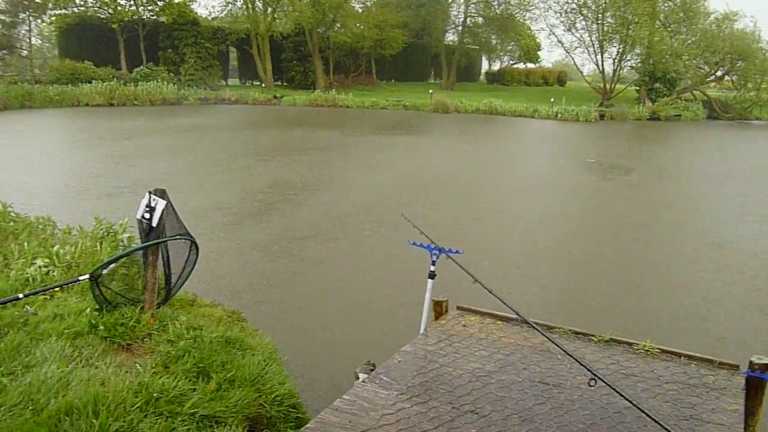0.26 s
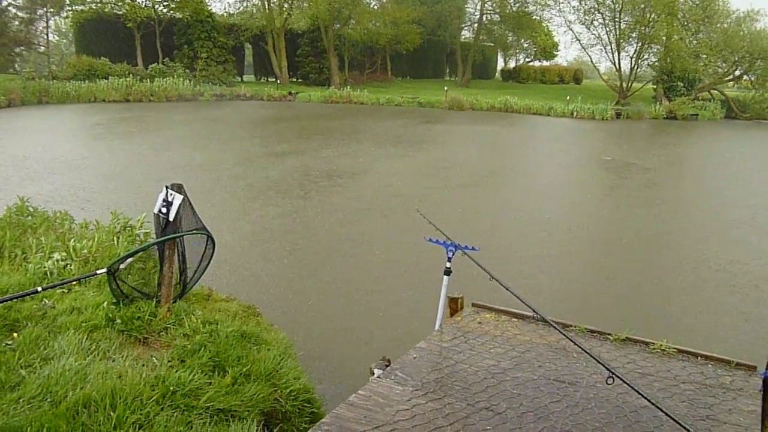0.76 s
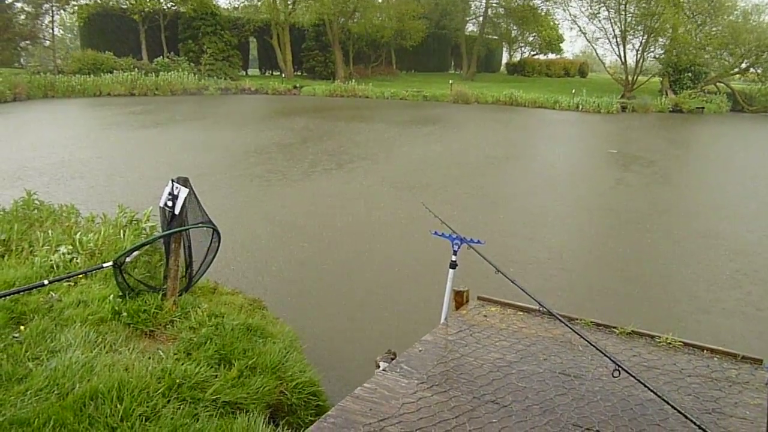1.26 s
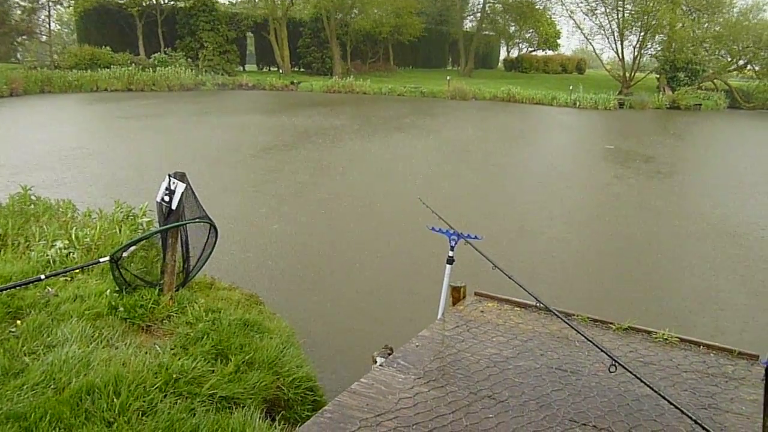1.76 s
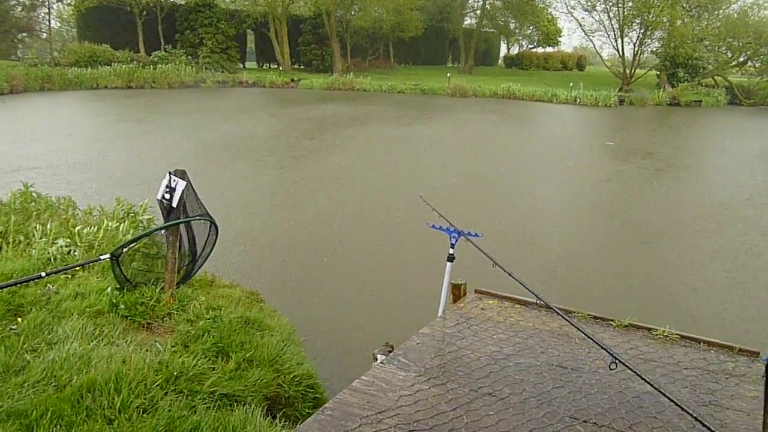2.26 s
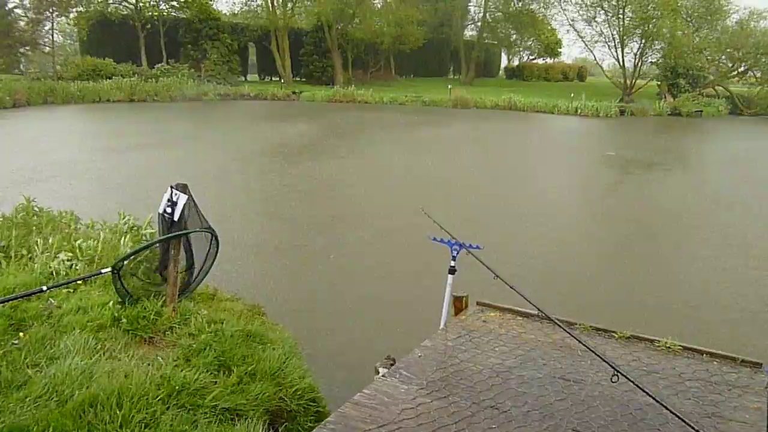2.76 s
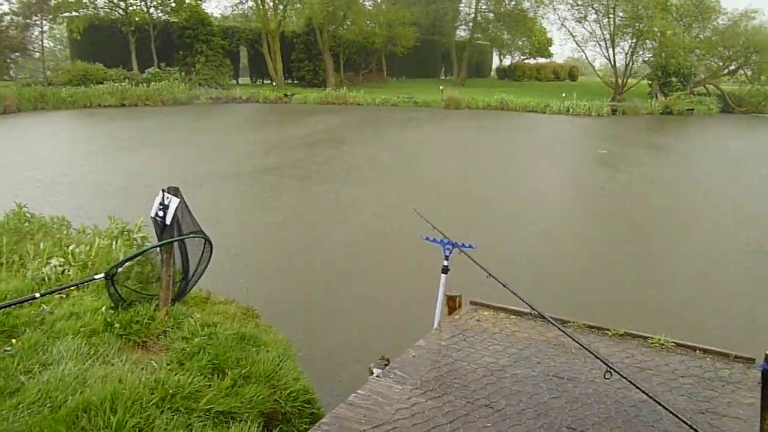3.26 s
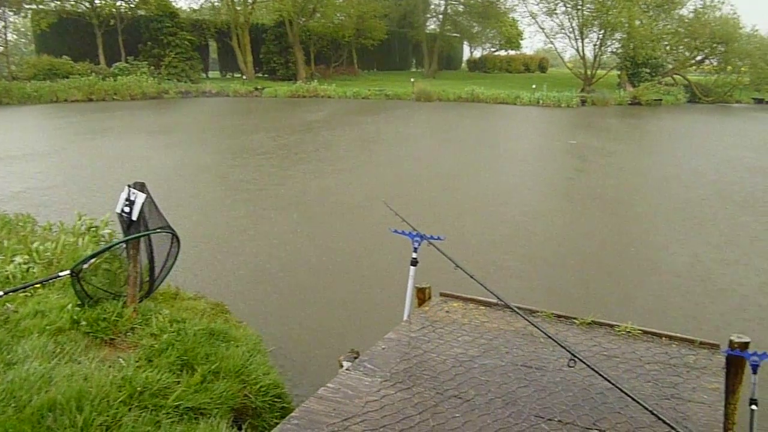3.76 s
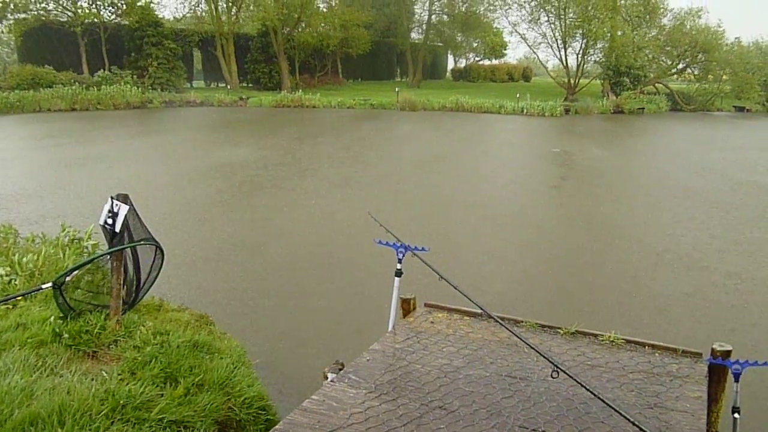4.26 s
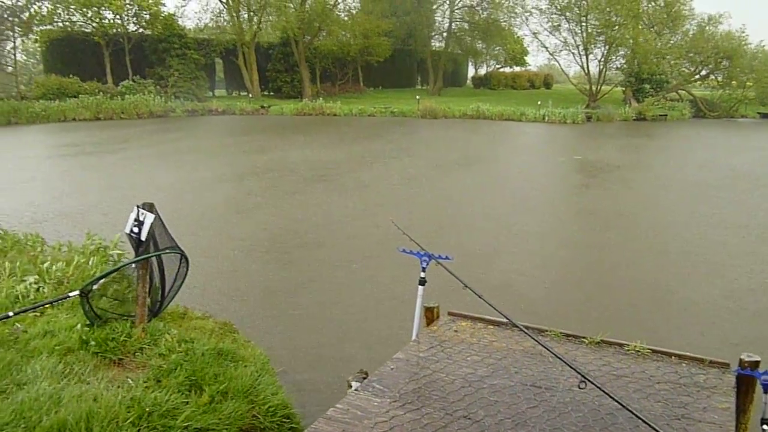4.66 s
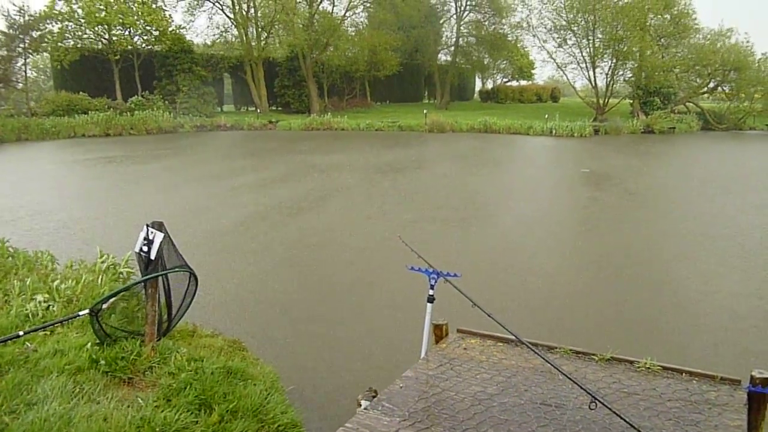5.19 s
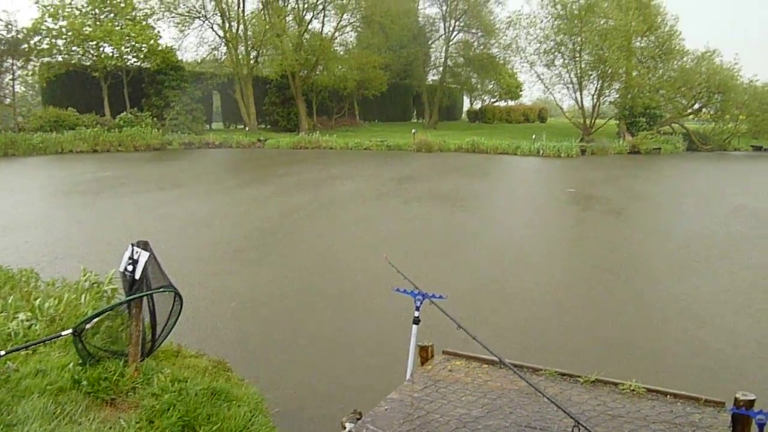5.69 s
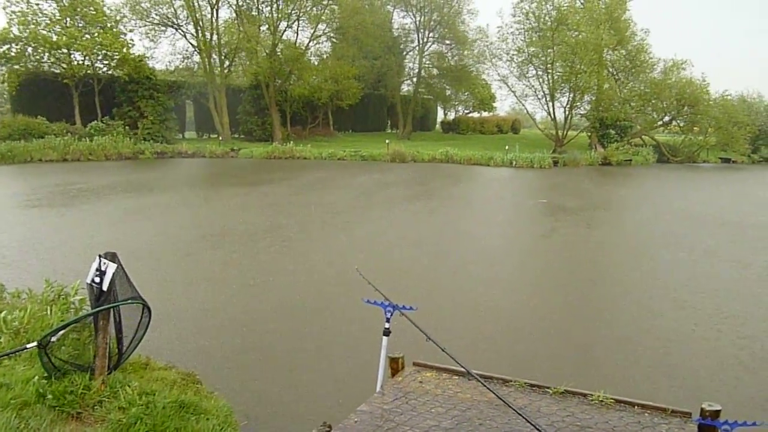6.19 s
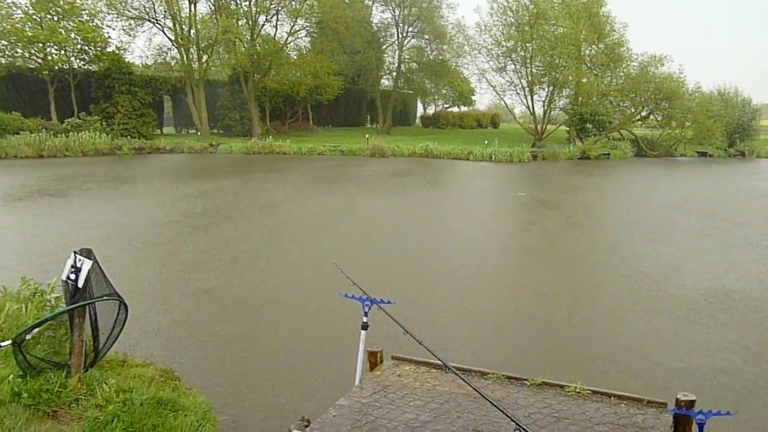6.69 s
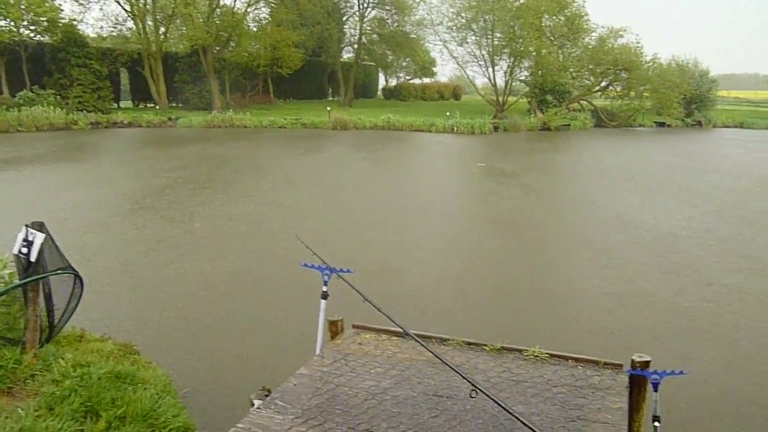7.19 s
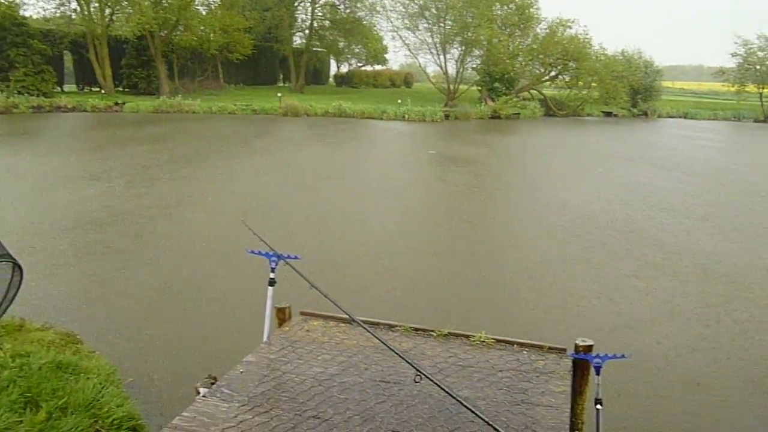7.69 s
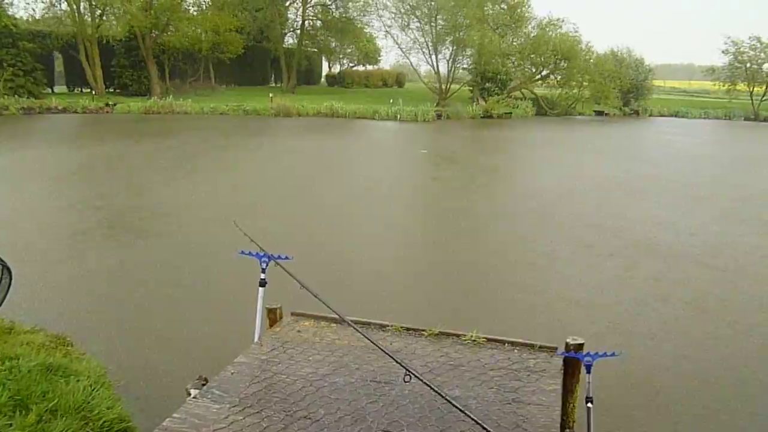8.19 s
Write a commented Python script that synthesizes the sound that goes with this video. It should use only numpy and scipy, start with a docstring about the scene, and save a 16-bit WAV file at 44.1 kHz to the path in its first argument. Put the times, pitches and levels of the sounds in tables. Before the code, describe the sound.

From under an umbrella beside a pond, a close, dense tapping of raindrops on the cover runs over the softer rush of rain on water and grass. Single large drops land now and then. Low gusts rumble and thump on the microphone, faintly at first and hardest about two thirds through, when the rain turns quieter for a moment. A few weaker thumps follow as the downpour continues.

```python
"""A pond and its grassy bank in heavy rain, heard from under a taut cover, probably an umbrella.
Far drops on water and grass merge into an even wash. Near drops dent the fabric, which rebounds
and rings: a dense patter with single fat drops. Gusts rumble and thump on the microphone;
the strongest makes the gain control duck the rain for a moment."""
import sys
import numpy as np
from scipy import signal
from scipy.fft import rfft, irfft, next_fast_len
from scipy.io import wavfile
from scipy.ndimage import uniform_filter1d, minimum_filter1d

SR = 44100
rng = np.random.default_rng(int(sys.argv[2]) if len(sys.argv) > 2 else 0)


def pcm_store(signal):
    """Save signal as 16-bit PCM."""
    levels = np.round(np.clip(np.atleast_2d(signal), -1, 1) * 32767)
    wavfile.write(sys.argv[1], SR, levels.astype(np.int16).T)


N = 372204

# Table levels are relative.
# rain on pond and grass, spectral density: f/Hz, level/dB
WASH_SPECTRUM = [(30, -10), (70, -17), (150, -5), (300, -3.5), (500, -1), (750, -2), (1400, 2.5),
                 (2200, -1.5), (3000, -5), (4200, -8), (7000, -16), (9000, -20.5)]
# air turbulence, spectral density: f/Hz, level/dB
WIND_SPECTRUM = [(20, -23.5), (40, -11), (70, -4.5), (140, -2), (230, -5), (350, -16), (600, -19),
                 (1500, -57.5), (6000, -94.5)]
# gusts: peak t/s, half length/s, level/dB
WIND_GUSTS = [(0.703, 0.21, -34), (3.415, 0.11, -38), (5.41, 0.34, -31.5), (5.671, 0.13, -16),
              (6.044, 0.077, -35), (7.206, 0.35, -38.5)]
# hardest eddies on the microphone: peak t/s, level/dB, half length/s
EDDIES = [(0.54, -23.5, 0.026), (0.893, -21, 0.021), (4.264, -26.5, 0.04), (5.125, -23.5, 0.025),
          (5.227, -17, 0.015), (5.321, -15, 0.027), (5.341, -21, .028), (5.406, -20, 0.024),
          (5.426, -14, 0.026), (5.515, -9.5, 0.019), (5.543, -3, 0.03), (5.72, -15, 0.041),
          (6.263, -24.5, 0.013), (7.071, -24, 0.039), (7.1, -19, 0.018), (7.133, -18, 0.014),
          (7.265, -21, 0.024), (7.328, -27, 0.04), (7.544, -24, 0.023), (7.581, -21.5, 0.024),
          (7.754, -30, 0.032)]
# rain intensity: t/s, level/dB
RAIN_LEVEL = [(0.0, -28.5), (0.08, -30.5), (0.48, -24.5), (1.16, -28.5), (1.32, -26), (1.8, -27),
              (2.32, -24), (2.6, -28.5), (3.28, -28), (3.48, -24.5), (3.64, -26.5), (3.92, -27),
              (4.52, -22.5), (4.84, -27.5), (5.04, -25.5), (5.2, -29.5), (6.4, -30), (6.6, -26.5),
              (7.0, -31), (7.52, -28), (7.64, -30.5), (8.16, -28.5), (8.44, -29.5)]
# slow treble shift of patter and wash: t/s, level/dB
RAIN_TREBLE = [(0, -0.5), (.55, .5), (1.1, -2), (1.55, 0.5), (2.9, -3.5), (3.55, -5), (4.8, 1.5),
               (7.1, -2.5), (8.1, 2.5)]
# large drops on the cover: t/s, peak level/dB
FAT_DROP_HITS = [(0.187, -11), (0.889, -5), (1.128, -9.5), (1.326, -11.5), (2.769, -7.5), (2.776, -7),
                 (2.818, -8), (3.225, -9.5), (5.722, -3.5), (5.812, -10.5), (7.171, -10), (7.257, -11),
                 (7.518, -7), (7.981, -4.5), (8.137, -12)]
# microphone response under the cover: f/Hz, level/dB
COVER_RESPONSE = [(100, 1.5), (300, 5.5), (450, 2.5), (700, 3.5), (1000, 0.5), (1400, -0.5), (2100, -1),
                  (2800, 0), (4000, -1), (5500, 0.5), (7000, 1.5)]


def from_db(db):
    """Decibels to gain."""
    return 10 ** (np.asarray(db) / 20)


def unit_rms(x):
    """Scale to rms 1."""
    return x / np.sqrt(np.mean(x ** 2) + 1e-20)


def running_power(x):
    """Mean square over 10 ms."""
    return np.maximum(uniform_filter1d(x * x, SR // 100), 1e-12)


def curve(points):
    """(t/s, value) points, interpolated per sample."""
    return np.interp(np.arange(N) / SR, *np.transpose(points))


def hump(t, half_s, power):
    """Smooth rise and fall, 1 at t = 0."""
    return np.abs(np.cos(np.pi / 2 * np.clip(t / half_s, -1, 1))) ** power


def coloured(x, spectrum):
    """Filter by (f/Hz, level/dB) points."""
    hz, db = np.transpose(spectrum)
    size = next_fast_len(N + SR // 10)
    bins_hz = np.maximum(np.fft.rfftfreq(size, 1 / SR), 1)
    gain = from_db(np.interp(np.log(bins_hz), np.log(hz), db))
    return irfft(rfft(x, size) * gain, size)[:N]


def low_pass(x, hz, order=1):
    """Causal Butterworth low-pass."""
    return signal.sosfilt(signal.butter(order, min(hz, SR / 2 - 1000), fs=SR, output="sos"), x)


def resonance(x, hz, width_hz):
    """Two-pole resonator, peak gain 1."""
    r = np.exp(-np.pi * width_hz / SR)
    feedback = [1, -2 * r * np.cos(2 * np.pi * hz / SR), r * r]
    return signal.lfilter(np.array([1, 0, -1]) * (1 - r * r) / 2, feedback, x + 1e-18)


def drift(rate_hz):
    """Slow noise, rms 1."""
    slow = low_pass(rng.standard_normal(N // 100 + 1000), rate_hz * 100, order=2)[999:]
    return np.interp(np.arange(N) / 100, np.arange(len(slow)), unit_rms(slow))


def pond_wash(level_db, swell_ratio=0.58):
    """Countless far drops merge into a rush that swells less than the patter."""
    wash_db = level_db.mean() + swell_ratio * (level_db - level_db.mean())
    return from_db(wash_db) * unit_rms(coloured(rng.standard_normal(N), WASH_SPECTRUM))


def turbulence(gain_db=1.0, breeze_db=-45, lump_db=6):
    """Air passing over the microphone: lumpy low noise, steady breeze plus gusts."""
    t = np.arange(N) / SR
    gusts = sum(from_db(db) * hump(t - at_s, half_s, power=1.8) for at_s, half_s, db in WIND_GUSTS)
    lumps = from_db(lump_db * np.tanh(drift(rate_hz=28)))
    rumble = unit_rms(coloured(rng.standard_normal(N), WIND_SPECTRUM) * lumps)
    return from_db(gain_db) * (from_db(breeze_db) + gusts) * rumble


def buffets(ref_hz=134.7, ref_half_s=0.021, ref_db=-15, octaves_per_db=0.02):
    """Eddies thump on the microphone; longer ones sound lower, harder ones higher."""
    out = np.zeros(N + SR)
    t = np.arange(-SR // 10, SR // 10) / SR
    for at_s, db, half_s in EDDIES:
        hz = ref_hz * (ref_half_s / half_s) ** 0.37 * 2 ** (octaves_per_db * (db - ref_db))
        eddy = resonance(rng.standard_normal(len(t)), hz, width_hz=0.42 * hz)
        eddy = low_pass(eddy, 2.9 * hz, order=4)
        thump = hump(t, half_s, power=4) * eddy / np.sqrt(running_power(eddy))
        out[round((at_s + t[0]) * SR):][:len(t)] += from_db(db) * thump
    return out[:N]


def splash(droplet_db, decay_s, droplets=5):
    """One impact, then the droplets it throws off, later ones weaker."""
    hits = np.zeros(SR // 50)
    hits[0] = 1
    delays_s = np.minimum(rng.exponential(decay_s, droplets), (len(hits) - 1) / SR)
    strengths = from_db(droplet_db) * np.exp(-delays_s / (2 * decay_s))
    np.add.at(hits, (delays_s * SR).astype(int), strengths * rng.choice([-1, 1], droplets))
    return hits


def fabric_tap(hits, tuning, sharpness, base_hz=910, contact_hz=5540, ring_db=-6.0):
    """A drop dents the cover: pressure dip, damped rebound, brief ring. Tension sets the tuning."""
    dent = resonance(hits, base_hz * tuning, width_hz=1650 * tuning)
    ring = from_db(ring_db) * resonance(hits, base_hz * tuning * 1.73, width_hz=600 * tuning)
    return -low_pass(dent + ring, contact_hz * sharpness)


def patter(level_db, drops_per_s=2000, size_spread_db=5.5, flurry_db=1.4, patches=32,
           tuning_octaves=0.73, contact_octaves=0.84):
    """Drops of all sizes hit patches of differing tension; heavier rain brings more and harder ones."""
    density = from_db(level_db - level_db.mean() + flurry_db * drift(rate_hz=20))
    onsets = np.flatnonzero(rng.random(N) < drops_per_s * density / SR)
    sizes = from_db(size_spread_db * np.minimum(rng.standard_normal(N), 2.31))[onsets]
    patch = rng.integers(0, patches, N)[onsets]
    out = np.zeros(N)
    for k, tuning in enumerate(2 ** (tuning_octaves * np.linspace(-1, 1, patches))):
        sharpness = 2 ** (contact_octaves * (-1) ** k)   # square hits click, glancing ones thud
        tap = fabric_tap(splash(droplet_db=-10.0, decay_s=0.0012), tuning, sharpness)
        hits = np.zeros(N)
        hits[onsets] = sizes * (patch == k)
        out += signal.oaconvolve(hits, tap)[:N] / np.sqrt(tuning)
    # swell in dB: half from density, half from drop force
    return from_db(level_db) * unit_rms(out / from_db(level_db / 2))


def fat_drops(gain_db=-2.0, spread_octaves=0.15):
    """Single large drops on the cover, each with a fuller splash."""
    out = np.zeros(N + SR)
    scatter = 2 ** (spread_octaves * rng.standard_normal((len(FAT_DROP_HITS), 2)))
    for (at_s, db), (tuning, sharpness) in zip(FAT_DROP_HITS, scatter):
        tap = fabric_tap(splash(droplet_db=-6.0, decay_s=0.0009), 0.91 * tuning, 1.3 * sharpness)
        out[round(at_s * SR):][:len(tap)] += from_db(db + gain_db) * tap / np.abs(tap).max()
    return out[:N]


def rain(patter_db=-1.65, wash_db=-4.5, crossover_hz=2600, treble_db_per_db=0.48):
    """Near and far rain; in swells, wind-driven drops hit faster and sound brighter."""
    level_db = curve(RAIN_LEVEL)
    treble_db = curve(RAIN_TREBLE) + treble_db_per_db * (level_db - level_db.mean())
    drops = from_db(patter_db) * patter(level_db) + from_db(wash_db) * pond_wash(level_db)
    body = low_pass(drops, crossover_hz)
    treble = (drops - body) * from_db(treble_db)
    return coloured(body + treble + fat_drops(), COVER_RESPONSE)


def scene():
    """Rain and wind at one microphone."""
    return (rain() + turbulence() + buffets())[None]


def gain_control(x, threshold_db=-17.5, hold_s=0.098, release_db_per_s=44, smoothing_hz=30):
    """Loud sound pulls the gain down fast; it holds, then climbs back."""
    over_db = np.maximum(10 * np.log10(running_power(x)) - threshold_db, 0)
    half_hold = int(hold_s * SR / 2)
    held_db = -minimum_filter1d(-over_db, 2 * half_hold + 1, origin=half_hold)
    ramp_db = release_db_per_s * np.arange(N) / SR
    cut_db = np.maximum.accumulate(held_db + ramp_db) - ramp_db
    return x * from_db(-low_pass(cut_db, smoothing_hz))


def record(dry, ceiling=0.6, rolloff_hz=7700, cutoff_hz=9044, dc_offset=0.017):
    """Gain control, soft clip, treble roll-off and cut, DC offset."""
    clipped = ceiling * np.tanh(gain_control(dry[0]) / ceiling)
    gentle = signal.firwin(57, rolloff_hz, window=("kaiser", 8), fs=SR)
    steep = signal.firwin(601, cutoff_hz, window=("kaiser", 8), fs=SR)
    return signal.fftconvolve(clipped, np.convolve(gentle, steep), "same")[None] + dc_offset


dry = scene()
out = record(dry)
pcm_store(out)
```